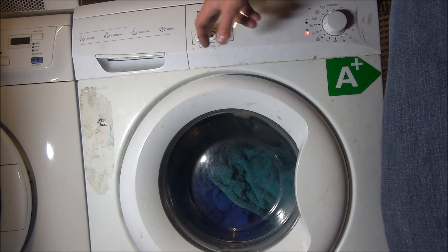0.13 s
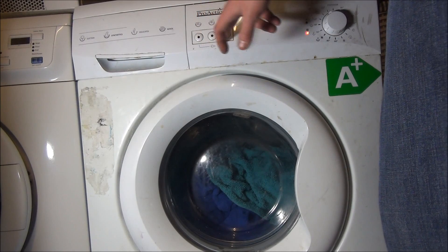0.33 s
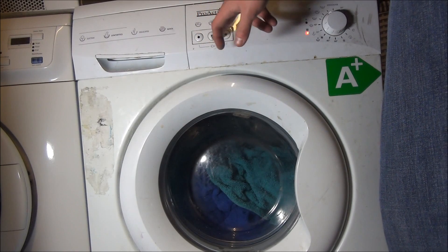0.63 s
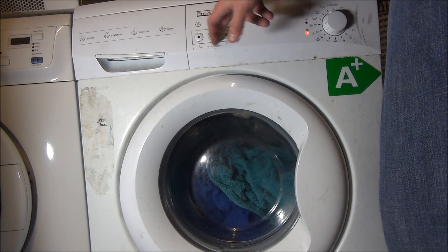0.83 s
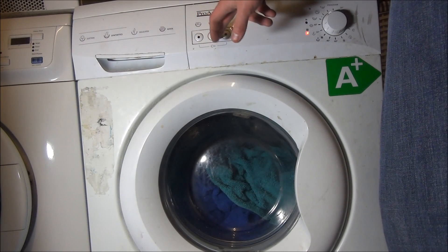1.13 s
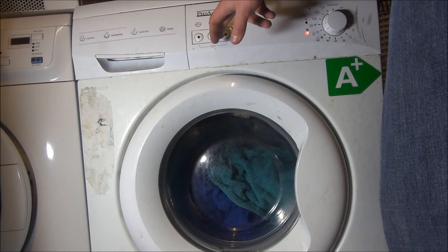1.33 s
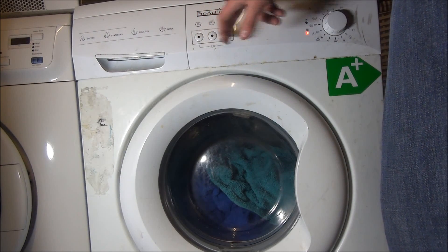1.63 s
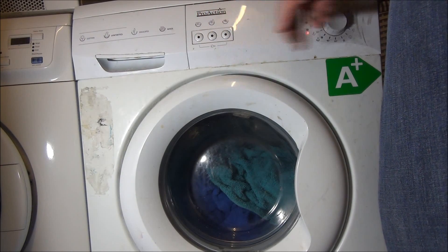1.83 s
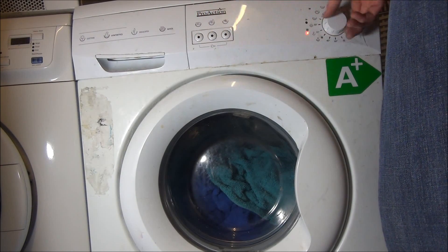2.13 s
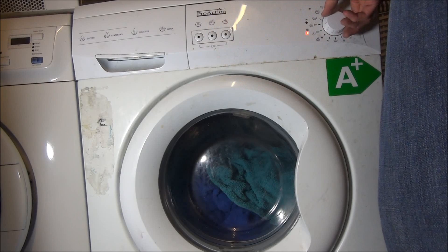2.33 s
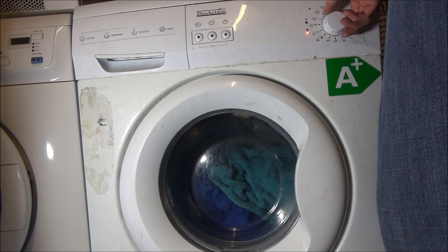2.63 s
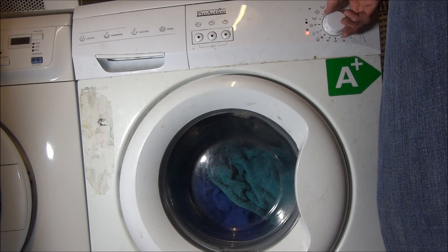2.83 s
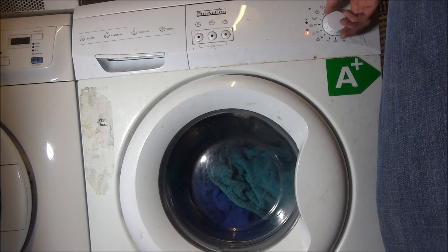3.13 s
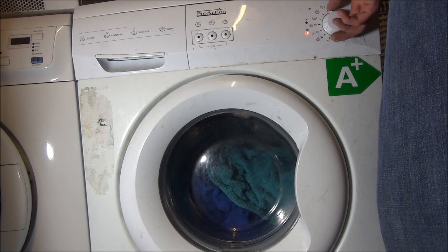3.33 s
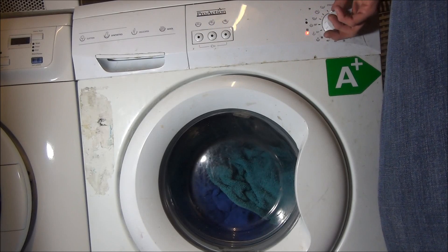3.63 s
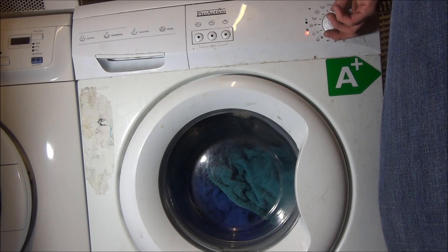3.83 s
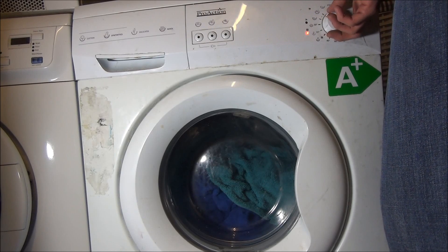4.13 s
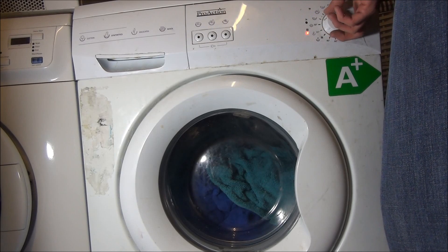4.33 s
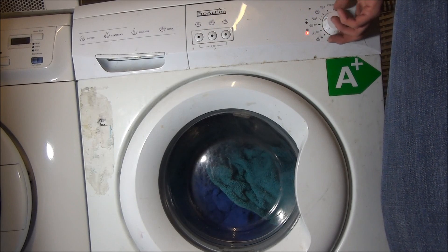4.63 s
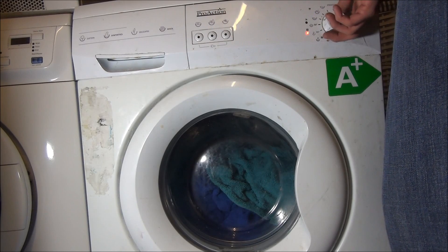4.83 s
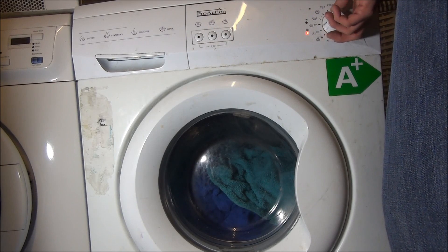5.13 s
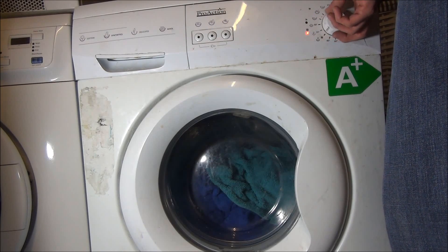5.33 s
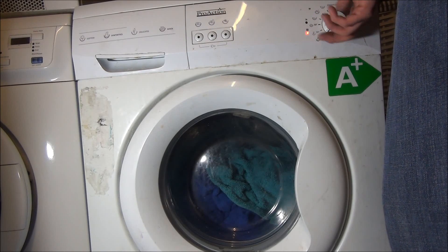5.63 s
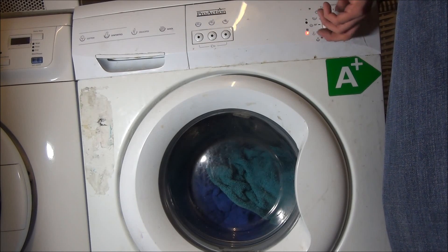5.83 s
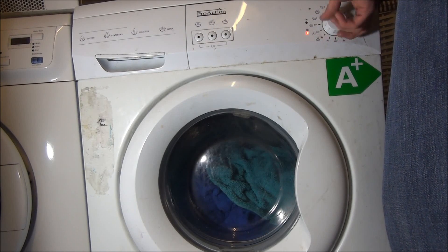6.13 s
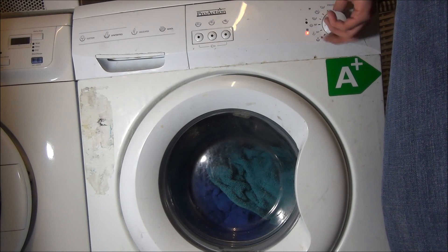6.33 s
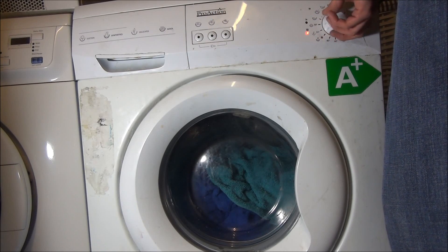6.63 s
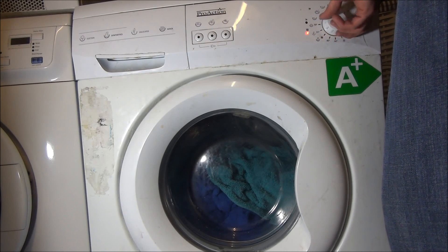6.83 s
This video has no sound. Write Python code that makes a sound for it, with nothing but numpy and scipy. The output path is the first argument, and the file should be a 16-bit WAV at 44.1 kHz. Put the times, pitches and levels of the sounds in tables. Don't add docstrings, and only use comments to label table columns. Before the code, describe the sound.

A close, dry stereo sound in a small hard room, over faint steady hiss, thin motor whine and a very quiet tick 25 times a second from the camera. A soft finger knock opens, with barely audible taps until a small button click at 1.3 s. A sleeve swishes gently around 1.9 s, then fingers hit the plastic dial with a sharp hollow clack at 2.1 s. It stays nearly quiet until about 3.7 s, when light knocks begin. Loud snaps follow at 4.0, 4.4, 4.6, 5.0 and 5.25 s, ringing the thin panel briefly, some with a springy ping and gritty scrape. A dense double clunk comes at 5.9 to 6.0 s, another strong cluster at 6.5 to 6.65 s, then weaker rattling clicks to 7 s. Dull finger knocks, low rubbing and soft deep handling thuds fill between.

```python
import sys
import numpy as np
from scipy import signal
from scipy.fft import rfft, irfft
from scipy.io import wavfile
from scipy.ndimage import uniform_filter1d

SR = 44100
rng = np.random.default_rng(int(sys.argv[2]) if len(sys.argv) > 2 else 0)


def undo_db(level):
    steps = np.asarray(level, float) / 20
    return 10 ** steps


def transcribe(signal):
    frames = np.atleast_2d(signal).T
    limited = np.clip(frames, -1, 1)
    pcm = np.round(limited * 32767).astype(np.int16)
    wavfile.write(sys.argv[1], SR, pcm)


N = 308700

# pitch in Hz, level in dB per Hz.
HISS_COLOUR = [(20, -39), (70, -2.5), (110, -5), (190, -0.5), (380, -3), (526, -1), (690, -5), (790, -1),
               (1180, -6.5), (1290, -12), (1920, -15.5), (4700, -22), (10200, -18.5), (15700, -21.5)]
# time in seconds, hiss level in
# dB.
HISS_LEVEL = [
    (0.0, -54.5),
    (2.09, -54.5),
    (2.38, -56.5),
    (4.0, -54.5),
    (7.0, -54.5),
]
# pitch in Hz, share of the common sound (no unit).
HISS_LEAN = [(80, 0.2), (170, 0), (300, -0.13), (600, -0.13), (1000, -0.36), (1500, -0.04), (2000, 0),
             (16000, 0)]
# pitch in Hz, level in dB against the common part.
HISS_APART = [(80, -16), (400, -18), (1000, -19), (1700, -17), (2200, -19), (5200, -16.5), (6000, -11.5),
              (10300, -13), (11500, -23), (16000, -29)]
# pitch in Hz, width in Hz, level in dB.
WHINES = [(770, 27, -72.5), (1078, 120, -112), (1143, 18, -66), (1203, 15, -64.5), (1430, 12, -67.5),
          (1525, 20, -71.5), (2530, 140, -70.5), (7815, 60, -96), (9810, 60, -86), (10400, 120, -74.5),
          (11400, 130, -106), (12100, 90, -75), (12300, 90, -86)]
# pitch in Hz, level in dB.
STEADY_TONES = [(7800, -81), (7827, -84), (8700, -88), (9000, -84), (9800, -82), (9850, -88), (11950, -81),
                (12000, -82), (12250, -84), (12300, -86), (13248, -79)]
# pitch in Hz, level in dB, time to fade 60 dB in seconds.
CAMERA_TICK = [(3684, 1.5, 0.027), (4073, 5.5, 0.016), (2503, -8.5, 0.13)]
# time in seconds, level in dB.
HANDLING = [
    (0.0, -60),
    (2.18, -69),
    (2.92, -69),
    (3.98, -56.5),
    (4.6, -62),
    (5.3, -63),
    (5.98, -52.5),
    (6.6, -66),
]
# pitch in Hz, level in dB per Hz.
HANDLING_COLOUR = [(15, -25), (40, -1.5), (75, 0), (110, -5), (200, -50)]

# start in
# seconds, panel level in dB, knob shell in dB against the panel, favoured panel pitch in units of 200 Hz, crack
# in dB against the panel.
SNAPS = [(1.283, -41.5, 7.5, 0.93, 3), (2.143, -20.5, 1.5, 4.1, -10.5), (3.992, -18.5, -18, 2.7, -19.5),
         (4.004, -22.5, -9, 6.8, -14), (4.383, -22, -4, 3, -17.5), (4.564, -40, -2.5, 2.8, -27),
         (4.583, -34.5, -13, 3.1, -30), (4.605, -26, -9, 3.06, -42), (4.975, -21.5, -30, 2.26, -32),
         (4.981, -17.5, -11.5, 3.05, -25), (5.241, -22, -26, 4.2, -14), (5.25, -24, -12.5, 3.45, -28),
         (5.918, -17.5, -5, 3.4, -11), (5.937, -17, -26, 3.3, -12.5), (5.971, -22, -4, 5.4, -8.5),
         (5.977, -18.5, -3.5, 4.3, -26), (6.057, -32.5, -3.5, 1.7, -20), (6.507, -19.5, -6, 2.8, -10),
         (6.542, -16, -7.5, 3.6, -21), (6.643, -15.5, -22, 2.9, -23.5), (6.655, -39, -14, 3.3, -7),
         (6.74, -27.5, -16, 2.95, -23), (6.797, -35.5, -4, 3.0, -30), (6.978, -35.5, -10, 3.8, -34)]
# start in seconds, panel level in dB,
# cabinet boom in dB against the panel, favoured panel pitch in units of 200 Hz.
KNOCKS = [(0.001, -33, -4, 3), (0.074, -43, -1, 1.2), (0.093, -43, -15, 1.1), (0.73, -45, -9, 2.6),
          (0.929, -45.5, -23, 0.74), (1.492, -43, -12.5, 0.91), (2.727, -51, 2, 0.83),
          (3.723, -43.5, -5, 1.4), (3.893, -41, -23, 2.3), (3.937, -40.5, -4, 1.2), (4.736, -36, -8, 3.2),
          (4.78, -38, -10, 1.4), (4.826, -40.5, -18, 2.2), (4.939, -34, -16, 2.1), (5.086, -40, -12, 1.2),
          (5.18, -34.5, -8, 1.7), (5.397, -38.5, -27, 2.7), (5.427, -35, -13, 3.2), (5.522, -40, -7, 3.1),
          (5.537, -45, -31, 2.5), (5.554, -34.5, -33, 3.2), (5.869, -36.5, -8, 0.88),
          (6.168, -38, -23, 2.5), (6.264, -46, -8.5, 3.1), (6.308, -40.5, -26, 2.9), (6.493, -35, -26, 1.8),
          (6.773, -41, -26, 2.1)]
# start in seconds, level in dB.
PINGS = [
    (4.006, -31),
    (4.386, -25.5),
    (4.604, -45),
    (4.741, -54),
    (4.984, -36),
    (6.51, -27),
    (6.66, -40.5),
]
CABINET_HZ = [154, 188, 232]
PANEL_HZ = [312, 375, 457, 510, 576, 655, 742, 868, 922, 1060, 1150, 1273, 1410, 1535]
SPRING_HZ = [2800, 2890, 2992]
# level in dB, time to fade 60 dB in seconds.
CABINET = [(0, .11), (-3, .11), (-7, .1)]
PANEL = [(1, 0.073), (-5, 0.15), (0.5, 0.052), (-17, 0.059), (-7, 0.069), (-13.5, 0.14), (2.5, 0.036),
         (-13, 0.15), (-9, 0.091), (7.5, 0.018), (-2, 0.034), (-7.5, 0.024), (-14, 0.16), (-19.5, 0.21)]
SPRING = [(-8, 0.052), (4.5, 0.052), (-2.5, 0.033)]
# pitch in Hz, level in dB, time to fade 60 dB in seconds.
SHELL = [(1850, -3, .05), (1980, -1, .05), (2225, -1, .04), (2520, -1, .035), (2800, -1, .035),
         (3130, 0, .03), (3500, -1, .03), (3900, 0, .03), (4300, -4, .025), (4700, -7, .02)]
# pitch in Hz, level in dB per Hz.
CRACK_COLOUR = [(2000, 2), (3500, -1.5), (4500, -9.5), (6400, -2.5), (8000, -5.5), (10500, -3.5),
                (13500, -8), (16000, -29)]
# pitch in Hz, level in dB per Hz.
GRIT_COLOUR = [(500, -19), (1000, 11), (2000, 4.5), (3500, -16), (4500, -26), (6000, -29)]
# pitch in Hz, level in dB per Hz.
THUD_COLOUR = [(120, -21), (200, -11), (400, 7), (600, 1.5), (1000, -12), (1500, -5), (2500, -33)]

# time of the peak in seconds, grit in dB, hiss in dB.
SCRAPES = [(.735, -81.5, -60), (4.383, -51, -41), (4.58, -69, -72), (4.974, -52, -44),
           (5.242, -45.5, -38.5), (5.402, -65, -50), (5.879, -65, -52), (5.918, -52, -53), (5.95, -56, -48),
           (6.507, -45, -45), (6.535, -47, -50), (6.642, -39, -44), (6.74, -65, -55), (6.778, -60, -49.5)]
# pitch in Hz, level in dB, time to fade 60 dB in seconds.
BUTTON = [(147.6, 1, .17), (300, -7, 0.091), (390, 0, 0.15)]
# pitch in Hz, level in dB per Hz.
BUTTON_TICK = [(5000, -16), (8500, -10), (11000, 2), (13500, -5), (16000, -12)]
# pitch in Hz, level in dB per Hz.
CLOTH_COLOUR = [(500, -8), (1500, 3), (3000, 0), (6000, -7), (12000, -2), (16000, -9)]
# pitch in Hz, level in dB, time to fade 60 dB in seconds.
FASCIA = [(194, -9, 0.059), (306, -9, 0.078), (376, -4, 0.048), (478, -1, 0.08), (562, 1.5, 0.064),
          (669, -3, 0.082), (736, -6, 0.051), (937, -7, .05), (2050, -1.5, 0.02), (2390, -4, .02),
          (2960, -4.5, 0.028), (3270, 0, .018), (3820, -2, .018), (5190, -12, 0.018)]
# time of most effort in seconds, panel rumble in dB.
RUBS = [
    (3.65, -51),
    (4.39, -43),
    (5.1, -46),
    (5.98, -42.5),
    (7.0, -44),
]

# pitch in Hz, time to fade 60 dB in seconds.
ROOM = [(150, 0.36), (500, 0.22), (2000, 0.15), (6000, 0.13), (15000, 0.1)]
# pitch in Hz, level in dB against the common part.
TAIL_APART = [(100, -14), (300, -30), (1000, -33), (2000, -20), (4000, -22), (7500, -9.5), (11000, -19),
              (14000, -31)]
# pitch in Hz, share of the common sound (no unit).
HIT_LEAN = [(80, 0.35), (170, 0.26), (300, -0.27), (800, -0.16), (1200, -0.15), (1600, -0.01),
            (16000, -0.075)]


def evened(x):
    return x / np.sqrt(np.mean(x ** 2) + 1e-20)


def read(points, hz):
    f, value = np.transpose(points)
    return np.interp(np.log(hz + 1), np.log(f + 1), value)


def add(mix, s, sound):
    part = mix[round(s * SR):][:len(sound)]
    part += sound[:len(part)]


def coloured(x, db_of_hz):
    n = x.shape[-1]
    gain = undo_db(read(db_of_hz, np.fft.rfftfreq(n, 1 / SR)))
    return irfft(rfft(x) * gain, n)


def joined(hz, rest):
    return np.column_stack([hz, rest])


def swell(s, rise_s, fall_s):
    t = np.arange(N) / SR
    distance = np.where(t < s, (s - t) / rise_s, (t - s) / fall_s)
    return undo_db(-20 * distance.clip(0, 9))


def ring(modes, luck, spread_db, rise_s, split=0.037):
    hz, db, t60 = np.tile(modes, (3, 1)).T[:, :, None]
    t = np.arange(SR // 5) / SR
    share, tune, phase = luck[:9 * len(modes)].reshape(3, -1, 1)
    neighbour = np.arange(len(hz))[:, None] >= len(modes)
    level = undo_db(db - 3.4 * neighbour + spread_db * share - 60 * t / t60)
    pitch = hz * (1 + split * tune * (neighbour + 0.19))
    waves = level * np.sin(2 * np.pi * pitch * t + 3 * phase)
    sound = waves.sum(0) * (1 - np.exp(-t / rise_s))
    return sound / abs(sound).max()


def hiss():
    frames, hz = N // 256 + 5, np.fft.rfftfreq(1024, 1 / SR)
    a, b, c, d, patches = rng.standard_normal((frames, 513, 5)).T
    patches = uniform_filter1d(patches, 8, 0)
    patches = evened(uniform_filter1d(patches, 12, 1))
    unshared = undo_db(read(HISS_APART, hz))[:, None] * (c + 1j * d)
    z = np.array([a + 1j * b, unshared])
    z *= undo_db(read(HISS_COLOUR, hz)[:, None] + 0.94 * patches)
    common, apart = signal.istft(z, nperseg=1024, noverlap=768)[1][:, :N]
    return np.array([common, apart]) / common.std()


def camera():
    t, out = np.arange(N) / SR, np.zeros(N)
    for hz, width, db in WHINES:
        r = np.exp(-np.pi * width / SR)
        noise = rng.standard_normal(N) + 1j * rng.standard_normal(N)
        wobble = signal.lfilter([1], [1, -r], noise)
        out += undo_db(db + 53) * evened((wobble * np.exp(2j * np.pi * hz * t)).real)
    for hz, db in STEADY_TONES:
        out += undo_db(db + 60) * np.sin(2 * np.pi * (hz * t + rng.random()))
    first_s, gap_s, spread_db = 0.0352, 0.04, 1.3
    for k, s in enumerate(np.arange(first_s, N / SR, gap_s)):
        db = (-4, 2.5)[k % 2] + spread_db * rng.standard_normal()
        add(out, s, undo_db(db) * ring(CAMERA_TICK, rng.standard_normal(27), spread_db, 0.00019, 0.013))
    return out


def handling():
    thud = evened(coloured(rng.standard_normal(N), HANDLING_COLOUR))
    rest_db, rise_s, fall_s = -110, 0.2, 0.67
    return thud * (undo_db(rest_db) + sum(undo_db(db - 5) * swell(s, rise_s, fall_s) for s, db in HANDLING))


def blow(panel_db, boom_db, shell_db, centre, crack_db=None):
    luck, noise = rng.standard_normal(260), rng.standard_normal(SR // 5)
    t = np.arange(len(noise)) / SR
    hard = crack_db is not None
    soft = 1 if hard else 3
    favour_db = -6 * np.log2(np.array(PANEL_HZ) / (200 * max(centre, 1))) ** 2
    panel = joined(PANEL_HZ, PANEL) * [1, 1, 1 if hard else 0.7]
    panel[:, 1] += favour_db
    chatter_db, chatter_s = -7.5, 0.0062
    touches = undo_db(chatter_db) * noise[:1500] * (abs(noise[1500:3000]) > 2) * np.exp(-t[:1500] / chatter_s)
    touches[0] += 1
    sound = signal.oaconvolve(ring(panel, luck, 1, 0.00041 * soft), touches)[:len(t)]
    sound = sound / abs(sound).max()
    thud = evened(coloured(np.roll(noise, 4000), THUD_COLOUR))
    sound += undo_db(-10 - 60 * t / 0.12) * (1 - np.exp(-t / 0.0064)) * thud
    sound += undo_db(boom_db) * ring(joined(CABINET_HZ, CABINET), luck[130:], 2.3, 0.00057, 0.0084)
    grit = evened(coloured(noise[::-1], GRIT_COLOUR))
    grit *= undo_db(-60 * t / 0.094) * (1 - np.exp(-t / (0.0019 * soft)))
    shell = ring(SHELL, luck[160:], 2, 0.00013 * soft)
    sound += undo_db(shell_db - 0.5) * (shell + undo_db(-7.5) * grit)
    if hard:
        rattle = undo_db(5 - 60 * t / 0.0059) + undo_db(-60 * t / 0.044) + undo_db(-9.5 - 60 * t / 0.041)
        rattle *= 1 - np.exp(-t / 0.00029)
        sound += undo_db(crack_db + 2) * evened(coloured(noise, CRACK_COLOUR)) * rattle
    return undo_db(panel_db - 1.5) * sound


def knob():
    out, last_s, delay_s = np.zeros(N), -1, 0.0006
    for s, db, boom_db, centre in KNOCKS:
        add(out, s + delay_s, blow(db, boom_db, -12.5, centre))
    for s, db, shell_db, centre, crack_db in SNAPS:
        if s - last_s < 0.04:
            boom_db = -12.5
        else:
            boom_db = -35 - (1 - 0.31) * db
        add(out, s + delay_s, blow(db, boom_db, shell_db, centre, crack_db))
        last_s = s
    for s, db in PINGS:
        luck = rng.standard_normal(27)
        add(out, s, undo_db(db) * ring(joined(SPRING_HZ, SPRING), luck, 0.71, 0.00022, 0.011))
    return out


def scraping():
    out = np.zeros(N)
    roughness = evened(uniform_filter1d(rng.standard_normal(N), 60))
    rough = undo_db(roughness) * rng.standard_normal(N)
    grit = evened(coloured(rough, GRIT_COLOUR))
    scrape_hiss = evened(coloured(rough, CRACK_COLOUR))
    for s, grit_db, hiss_db in SCRAPES:
        out += swell(s, 0.017, 0.037) * (undo_db(grit_db) * grit + undo_db(hiss_db) * scrape_hiss)
    return out


def button():
    out, t = np.zeros(N), np.arange(SR // 5) / SR
    tick_db, tick_t60_s = -27.5, 0.012
    tick = evened(coloured(rng.standard_normal(len(t)), BUTTON_TICK)) * undo_db(tick_db - 60 * t / tick_t60_s)
    add(out, 1.2845, undo_db(-40.5) * ring(BUTTON, rng.standard_normal(50), 0.6, 0.0024, 0.025) + tick)
    return out


def sleeve():
    swish = evened(coloured(rng.standard_normal(N), CLOTH_COLOUR))
    return undo_db(-60.5) * swell(1.87, 0.55, 0.49) * swish


def slap():
    out = np.zeros(N)
    add(out, 2.144, undo_db(-12.5) * ring(FASCIA, rng.standard_normal(130), 0.65, 0.00084, 0.048))
    return out


def rubbing():
    slips_per_s = 400
    slips = undo_db(3 * rng.exponential(1, N).clip(0, 3)) * (rng.random(N) < slips_per_s / SR)
    slips *= rng.choice([-1, 1], N)
    panel = ring(joined(PANEL_HZ, PANEL), rng.standard_normal(150), 0.66, 0.0019)
    rumble = evened(signal.oaconvolve(slips, panel)[:N])
    return rumble * sum(undo_db(db - 17) * swell(s, 0.76, 1) for s, db in RUBS)


def room(x):
    size = SR // 2
    taps = np.zeros((2, size))
    at = np.arange(120, size - 20, 20) + rng.integers(0, 20, (2, (size - 121) // 20))
    np.put_along_axis(taps, at, rng.choice([-1., 1.], at.shape), 1)
    hz, t, z = signal.stft(taps, SR, nperseg=256)
    fade = undo_db(-60 * t / read(ROOM, hz)[:, None])
    spectrum = rfft(signal.istft(z * fade, SR, nperseg=256)[1])
    power = abs(spectrum) ** 2
    level = np.sqrt(uniform_filter1d(power, size=700) / uniform_filter1d(power, size=45))
    tail = irfft(spectrum * level)[:, :size - 1000]
    tail = tail / np.linalg.norm(tail[0])
    common, apart = signal.fftconvolve(x[None], tail, axes=1)[:, :N]
    return common, coloured(apart, TAIL_APART)


def ports(common, apart, lean):
    side = irfft(rfft(common) * read(lean, np.fft.rfftfreq(N, 1 / SR)), N) + apart
    return np.array([common + side, common - side])


def scene():
    air, air_apart = hiss()
    level = undo_db(np.interp(np.arange(N) / SR, *np.transpose(HISS_LEVEL)))
    background = level * ports(air + camera(), air_apart, HISS_LEAN)
    grip = handling() * [[1.2], [0.8]]
    machine = knob() + scraping() + button() + sleeve() + slap() + rubbing()
    near = signal.sosfilt(signal.butter(4, 110, "high", fs=SR, output="sos"), machine)
    tail, tail_apart = room(near)
    return grip + background + ports(near + undo_db(-7) * tail, undo_db(-1) * tail_apart, HIT_LEAN)


def low_pass(x):
    return signal.sosfilt(signal.butter(12, 15790, fs=SR, output="sos"), x)


def record(dry):
    thin = signal.sosfilt(signal.butter(1, 60, "high", fs=SR, output="sos"), dry)
    return low_pass(thin)


dry = scene()
out = record(dry)
transcribe(out)
```